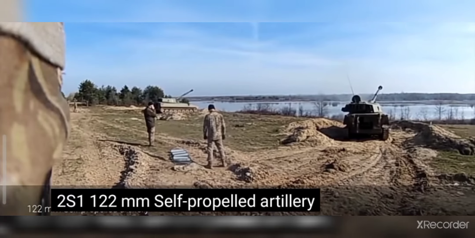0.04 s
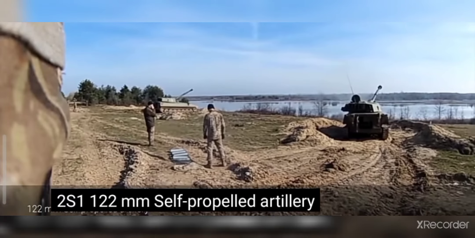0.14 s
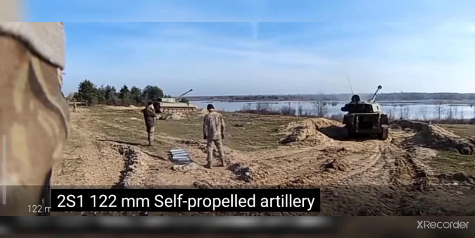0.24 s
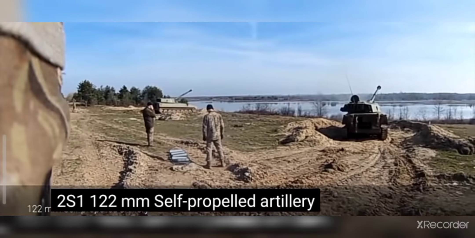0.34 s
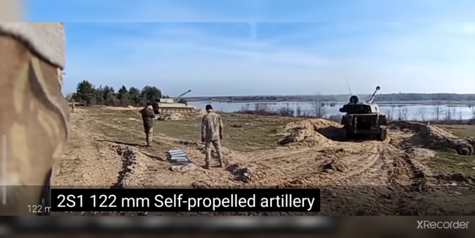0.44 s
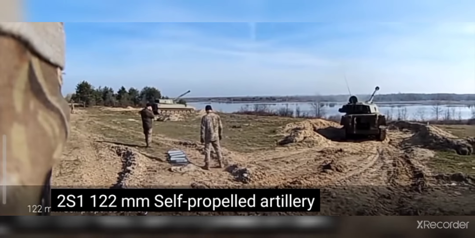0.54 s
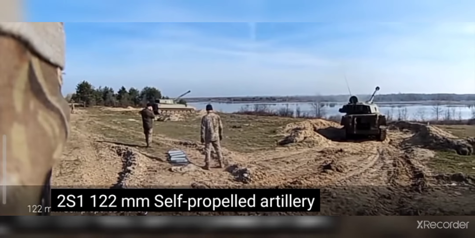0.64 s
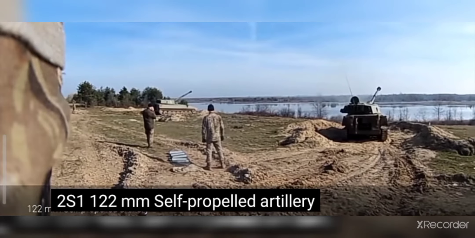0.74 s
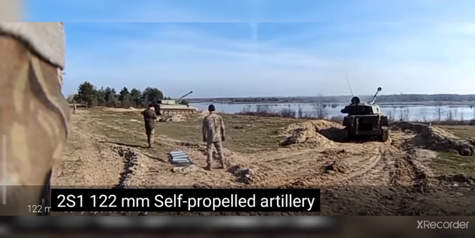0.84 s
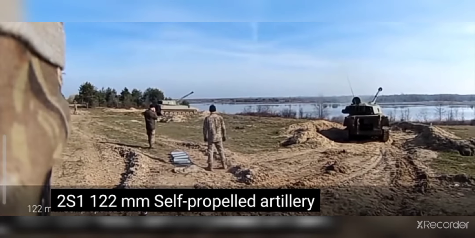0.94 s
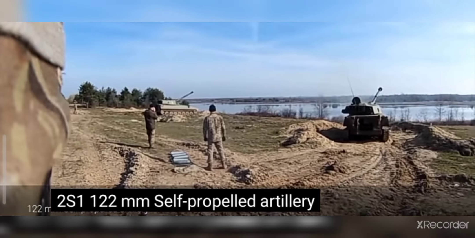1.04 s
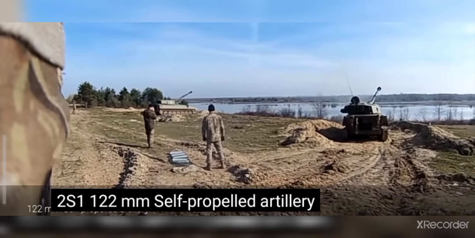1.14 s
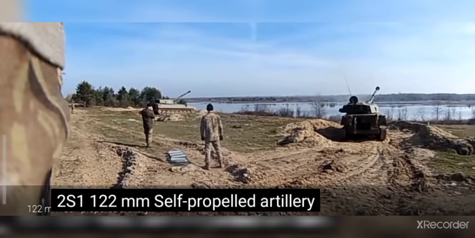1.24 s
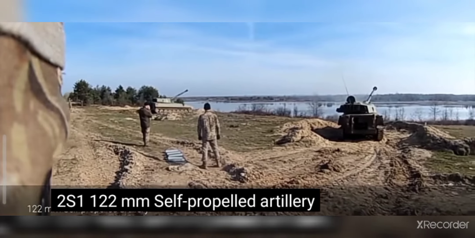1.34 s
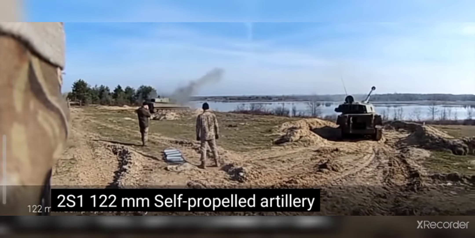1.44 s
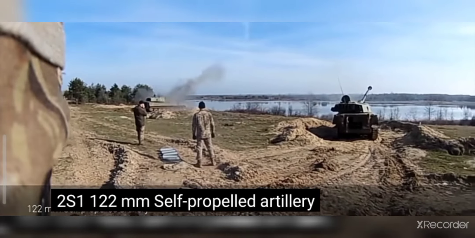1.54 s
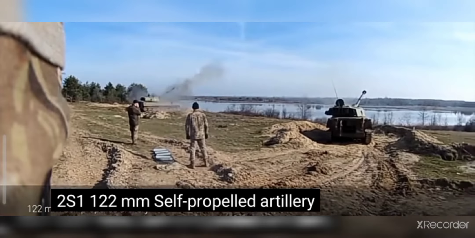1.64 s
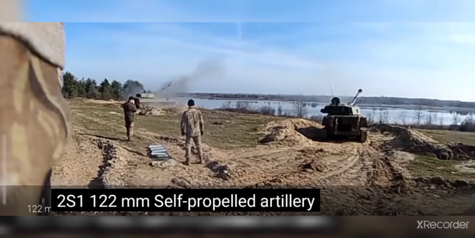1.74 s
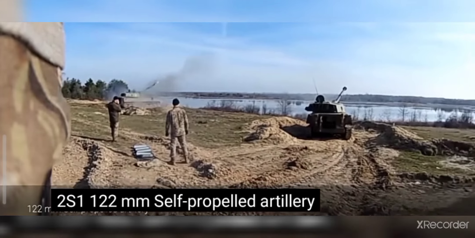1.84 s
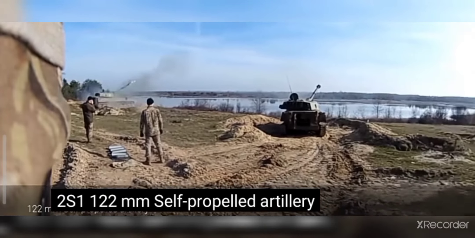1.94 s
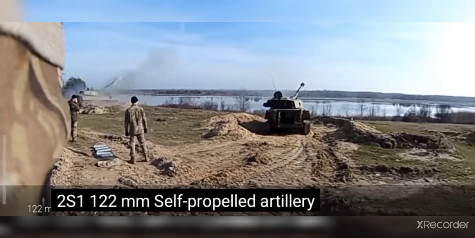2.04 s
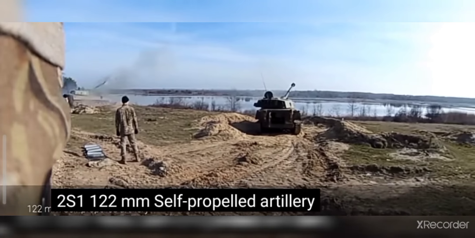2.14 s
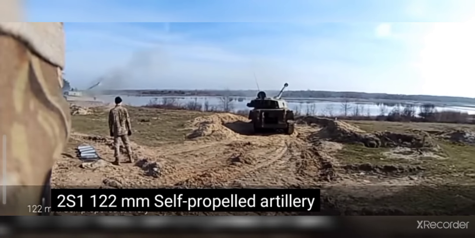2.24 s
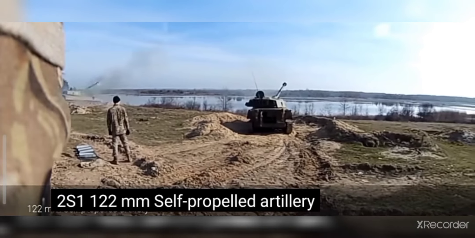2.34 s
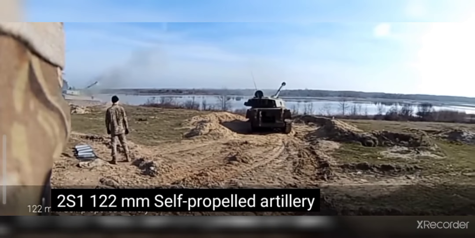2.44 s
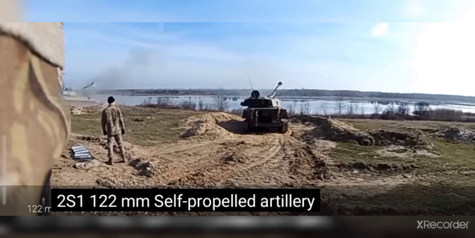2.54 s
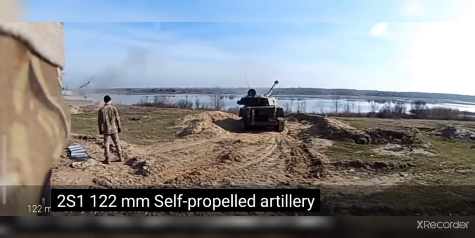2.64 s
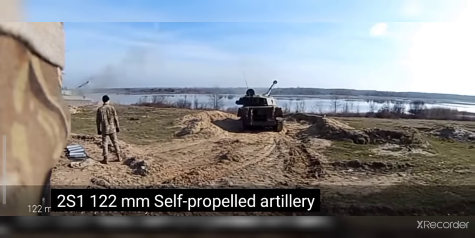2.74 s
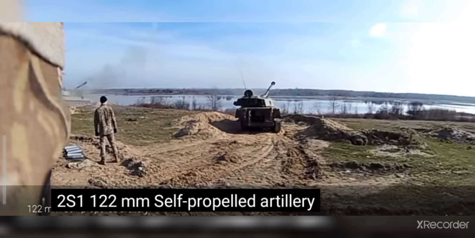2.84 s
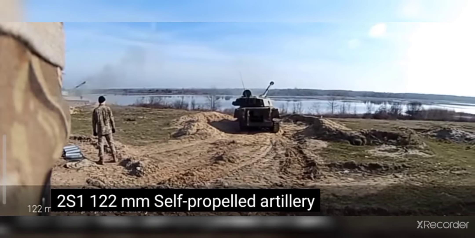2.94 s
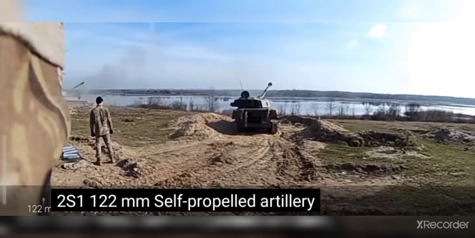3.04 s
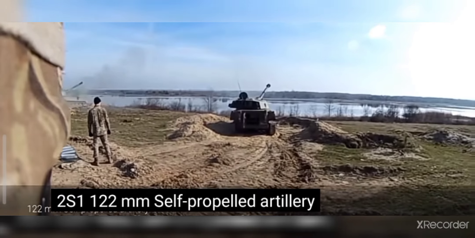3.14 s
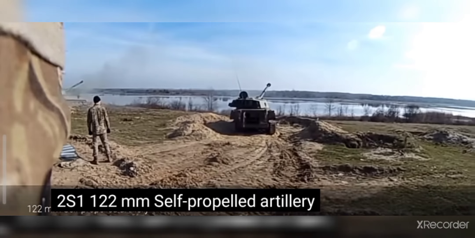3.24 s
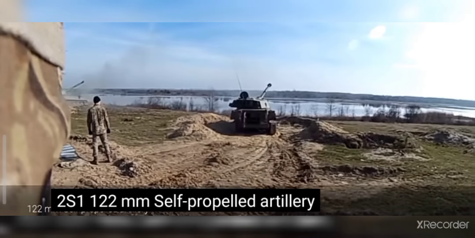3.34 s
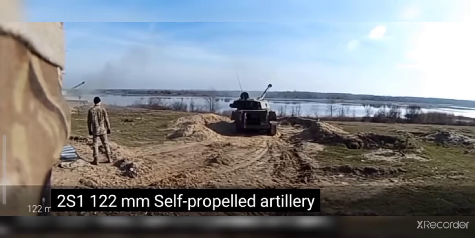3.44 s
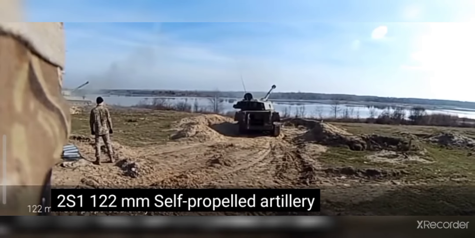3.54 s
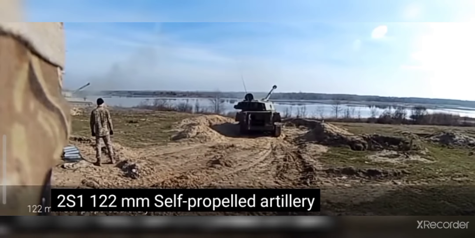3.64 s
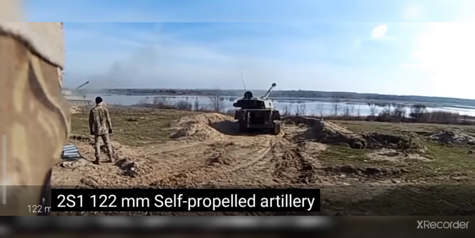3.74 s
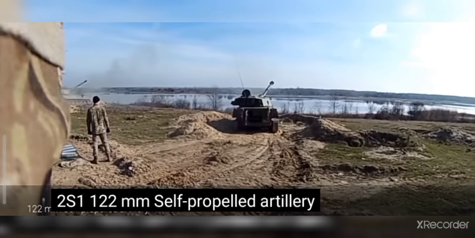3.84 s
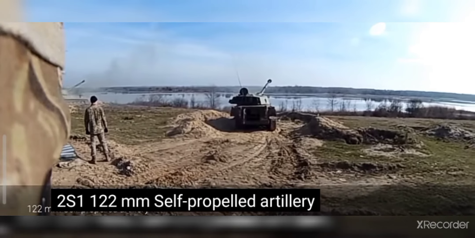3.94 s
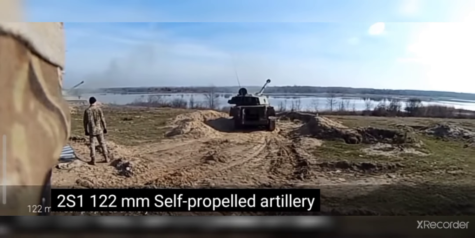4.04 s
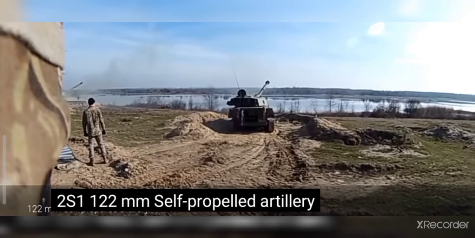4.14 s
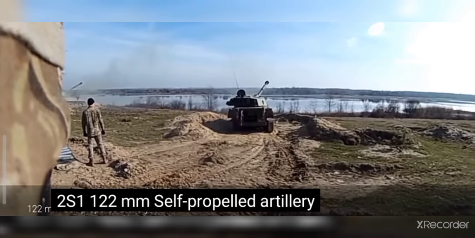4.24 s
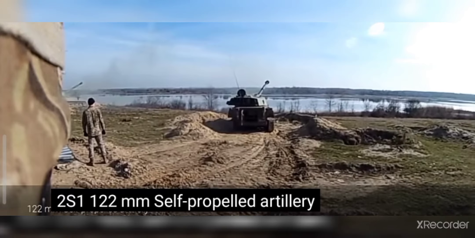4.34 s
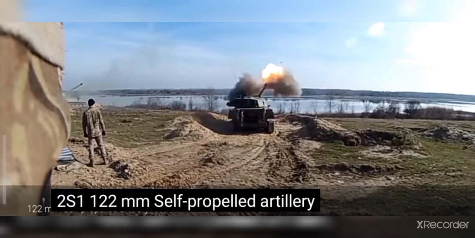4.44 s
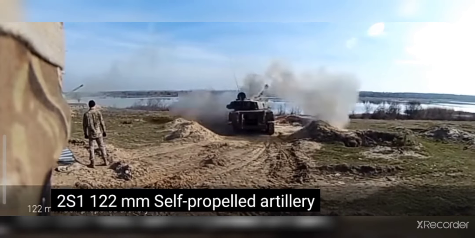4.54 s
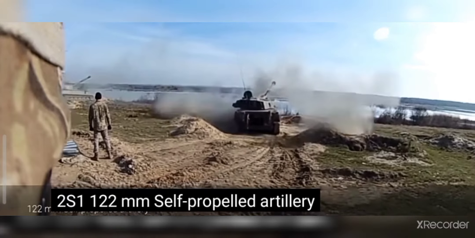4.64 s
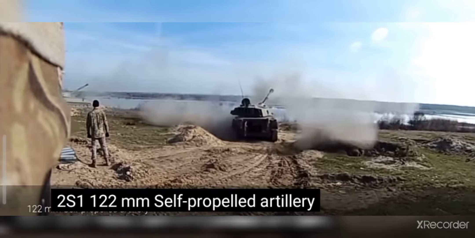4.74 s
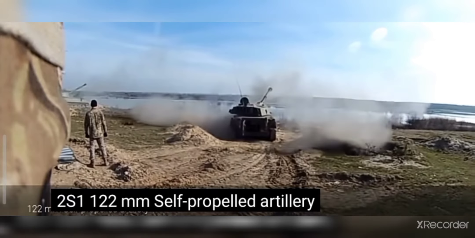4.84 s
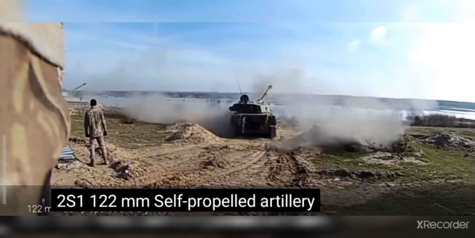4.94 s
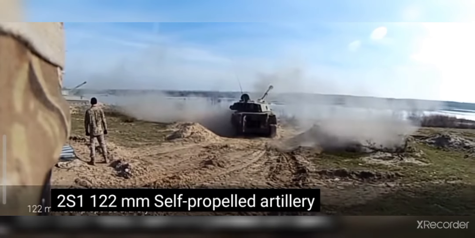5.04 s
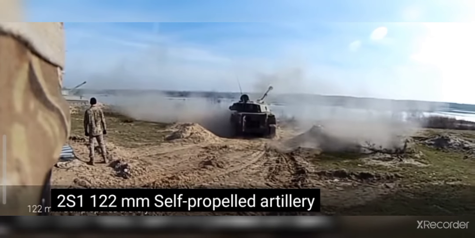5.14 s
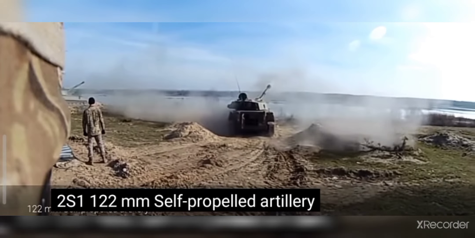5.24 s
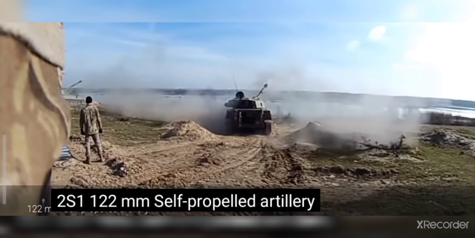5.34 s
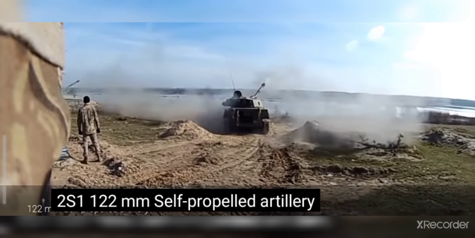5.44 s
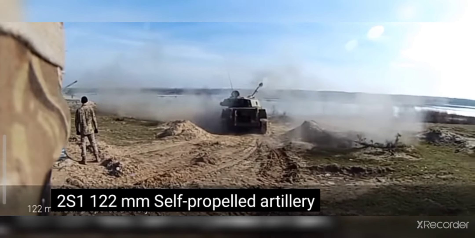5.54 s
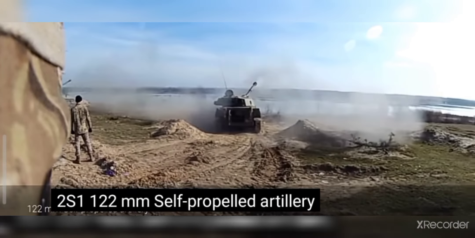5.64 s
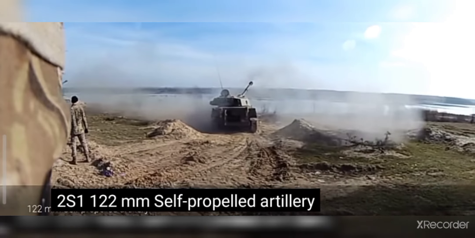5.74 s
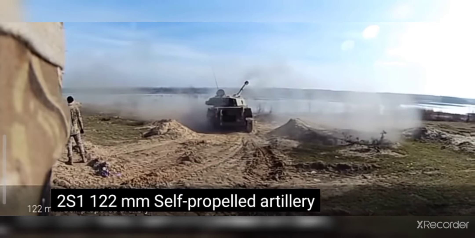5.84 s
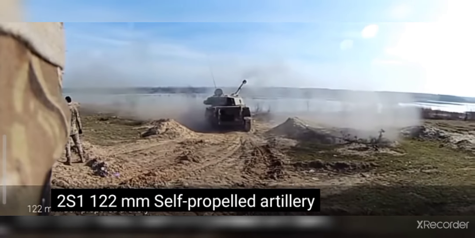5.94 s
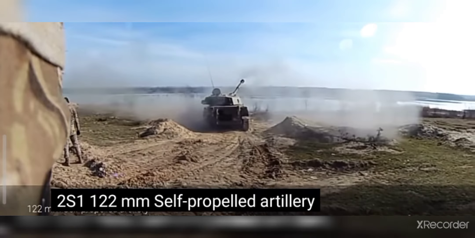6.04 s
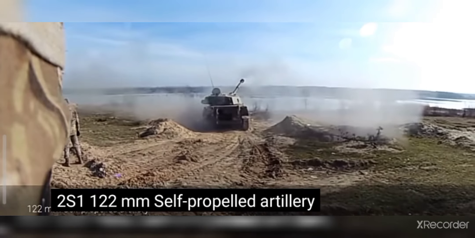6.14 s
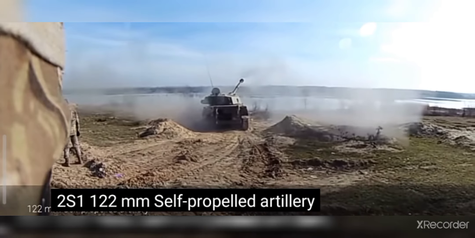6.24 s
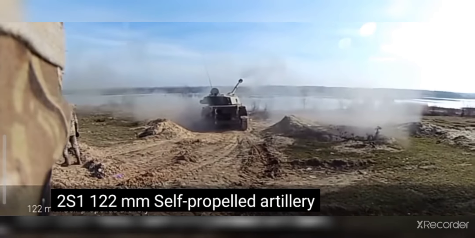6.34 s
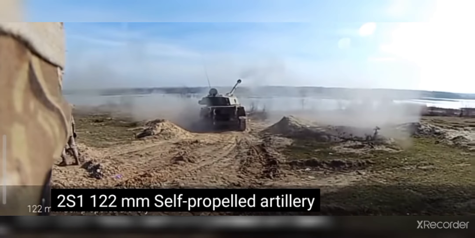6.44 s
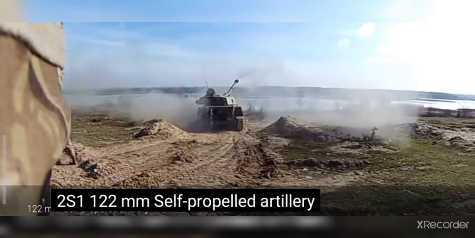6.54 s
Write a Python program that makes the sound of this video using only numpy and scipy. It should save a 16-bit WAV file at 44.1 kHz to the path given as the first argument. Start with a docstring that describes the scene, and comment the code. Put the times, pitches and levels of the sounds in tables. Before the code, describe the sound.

Over a faint diesel idle, two heavy guns fire about three seconds apart, torn overloaded blasts rolling into long low echoes, then a metallic clank and ringing case.

```python
"""Diesel engines idle on an open lake shore, then two self-propelled howitzers fire in turn, the far one first.
Each blast is a set of pressure fronts, crackles and roaring gas that overloads the input into a torn,
square-edged roar; filtered noise then rolls away as long low echoes. The shells leave as fluttering hiss.
After the near shot the breech clanks open and the spent case lands ringing, both as sums of decaying modes."""
import sys
import numpy as np
from scipy import signal
from scipy.fft import rfft, irfft, next_fast_len
from scipy.io import wavfile
from scipy.ndimage import uniform_filter1d

SR = 44100
rng = np.random.default_rng(int(sys.argv[2]) if len(sys.argv) > 2 else 0)


def materialize(psi):
    """Save the field psi as 16-bit PCM at rate SR to the path in sys.argv[1].

    A 1-D psi becomes a single channel; in a 2-D psi each row is a channel.
    """
    bounded = np.clip(np.atleast_2d(psi).T, -1, 1)
    quanta = np.round(bounded * 32767).astype(np.int16)
    wavfile.write(sys.argv[1], SR, quanta)


N = 290735
T = np.arange(N) / SR  # time, s
LENGTH = next_fast_len(N, True)
HZ = np.fft.rfftfreq(LENGTH, 1 / SR)

# spectrum of the roaring gas, also of the grit in the ground return: f/Hz, level/dB
GAS_SPECTRUM = [(40, -7.5), (250, 8.5), (800, -1.5), (2000, 2.5), (3000, -5), (7000, -16), (11000, -20.5),
                (16000, -26.5)]
# spectrum of the treble hiss in the echoes and flares: f/Hz, level/dB
HISS_SPECTRUM = [(1000, -13), (2500, 18.5), (4000, 12), (5300, 5), (7000, 3), (8700, 0.5), (10500, -1),
                 (14500, -8), (16000, -27.5)]


def amp(db):
    """Definition of the decibel: 20 dB is a tenfold gain."""
    return 10 ** (np.asarray(db) / 20)


def evened(x):
    """Normalization by root mean square: the result has rms 1."""
    return x / np.sqrt(np.mean(x ** 2) + 1e-20)


def shape(points):
    """Spectral envelope: a table of f/Hz, level/dB read as a gain on a logarithmic frequency axis."""
    hz, db = np.transpose(points)
    return amp(np.interp(np.log(HZ + 1), np.log(hz + 1), db))


def coloured(x, gain):
    """Linear filtering: the spectrum is multiplied by a gain at every frequency."""
    return irfft(rfft(x, LENGTH) * gain, LENGTH)[:N]


def noise(gain):
    """Coloured noise: filtered Gaussian white noise of rms 1."""
    return evened(coloured(rng.standard_normal(LENGTH), gain))


def drift(rate_hz):
    """Band-limited random fluctuation: noise of rms 1 under a Gaussian low-pass gain."""
    return noise(np.exp(-(HZ / rate_hz) ** 2))


def steadied(x, seconds):
    """Envelope levelling: division by short-time rms removes slow swells and keeps quick ones."""
    envelope = abs(signal.hilbert(x, next_fast_len(N))[:N])
    power = uniform_filter1d(envelope ** 2, max(int(seconds * SR), 1))
    return evened(x / np.sqrt(abs(power) + 1e-6))


def burst(s, decay, rise=0.0001, hold=0):
    """Exponential growth and relaxation: the envelope reaches 1 at s, holds and dies away."""
    before = (s - T) / rise
    after = (T - s - hold) / decay
    return np.exp(-np.clip(np.maximum(before, after), 0, 20))


def broad_rush():
    """Broadband noise with random amplitude modulation: a broad rush of noise swells twice."""
    # the two swells: t at full strength/s, level/dB, hold/s
    swell_times = [(3.322, -50.5, 0.9), (6.51, -48.5, .2)]
    # spectrum of the rush: f/Hz, level/dB
    swell_spectrum = [(120, 3), (260, 4.5), (500, 5), (900, 3), (1800, 0.5), (2600, -2), (3200, -9),
                      (4200, -29), (6000, -49)]
    rise_s, decay_s = 0.11, 0.5
    swells = sum(amp(db) * burst(s, decay_s, rise_s, hold) for s, db, hold in swell_times)
    uneven = amp(0.71 * drift(25))
    return evened(noise(shape(swell_spectrum)) * uneven) * swells


def engines(rattle_db=-62, waver_db=2.85, wander=0.0202):
    """Periodic exhaust: tones share one wandering engine speed, over a low rumble and valve-gear rattle."""
    # exhaust tones: f/Hz, level/dB
    hum_tones = [(37.7, -50.5), (71, -51), (94, -54.5), (123.5, -50.5), (204, -65)]
    # spectrum of the rumble: f/Hz, level/dB
    idle_spectrum = [(12, -29), (20, 5.5), (81, -20), (96, -7.5), (107, -8.5), (127, 0), (150, -8.5),
                     (210, -10.5), (319, -27.5), (1190, -40.5), (1960, -72.5), (2460, -46.5), (4060, -48.5),
                     (14300, -51.5), (16000, -64.5)]
    # spectrum of the valve gear: f/Hz, level/dB
    rattle_spectrum = [(800, -14.5), (1300, -2), (1700, -3), (2020, 4), (2450, -12), (2750, -5),
                       (3300, -19), (5000, -46.5)]
    idle_db = -50
    run = np.cumsum(1 + wander * drift(1)) / SR  # cycles turned by a 1 Hz tone
    hum = np.zeros(N)
    for hz, db in hum_tones:
        tone = np.sqrt(2) * np.sin(2 * np.pi * (hz * run + rng.random()))
        hum += amp(db + waver_db * drift(5)) * tone
    rumble = amp(idle_db) * steadied(noise(shape(idle_spectrum)), 0.4)
    rattle = amp(rattle_db + 1.0 * drift(40)) * noise(shape(rattle_spectrum))
    return hum + rumble + rattle


def metal(hits, modes, chatter=0.54, chatter_hz=45):
    """Modal vibration: a blow clatters and rings the modes of a piece that chatters against what it touches."""
    # spectrum of the clatter: f/Hz, level/dB
    clatter_spectrum = [(200, -26), (700, 4), (1300, 7), (2600, 11.5), (3600, -60), (7000, -2.5),
                        (15000, -33)]
    clatter, out = noise(shape(clatter_spectrum)), np.zeros(N)
    for hz, db, t60 in modes:
        sway = 1 + chatter * (drift(chatter_hz) + 1j * drift(chatter_hz))  # random amplitude and phase
        tone = (sway * np.exp(2j * np.pi * hz * T)).real
        decay = t60 / np.log(1000)
        ringing = sum(amp(ring_db) * burst(s, decay) for s, ring_db, _, _ in hits)
        out += amp(db) * tone * ringing
    for s, _, clatter_db, decay in hits:
        out += amp(clatter_db) * clatter * burst(s, decay)
    return out


def breech():
    """Impact excitation of a heavily damped body: the breech clanks open."""
    # blows: t/s, ring level/dB, clatter level/dB, clatter decay/s
    breech_blows = [(4.9105, -30, -15.5, 0.006), (4.926, -27, -22.5, 0.03)]
    # modes: f/Hz, level relative to the ring/dB, t60/s
    breech_modes = [(1460, -2, 0.13), (1410, -1, 0.16), (1980, -5, 0.22), (2640, -15, .08),
                    (3130, -22, .11), (7800, -18, 0.12)]
    return metal(breech_blows, breech_modes)


def spent_case():
    """Impact excitation of a lightly damped body: the spent case lands ringing."""
    # blows: t/s, ring level/dB, clatter level/dB, clatter decay/s
    case_blows = [(5.279, -30, -28, 0.015), (5.2855, -64, -33.5, 0.023)]
    # modes: f/Hz, level relative to the ring/dB, t60/s
    case_modes = [(1022, -5, 0.57), (1630, -5, 0.78), (2280, -12, 0.68), (2486, -1, 0.43), (2546, 6, 0.38),
                  (2723, 3, 0.24), (3340, -23, .19), (4630, -19, 0.24), (7400, -19, 0.2)]
    return metal(case_blows, case_modes)


def shell(width_hz=520, flutter_db=1.4):
    """Aerodynamic noise: air torn round each shell is a fluttering, fading noise band of wandering centre."""
    # departing shells: t at full strength/s, level/dB, hold/s, decay/s
    shell_flights = [(1.554, -44.5, .03, 0.56), (4.827, -37, 0.27, 0.49)]
    # centre of the band: t/s, f/Hz
    centre_path = [(1.56, 2802), (4.76, 3150), (4.93, 2857), (5.0, 3130), (5.25, 3376), (5.5, 2986),
                   (6.4, 2910)]
    rise_s = 0.034
    centre_hz = np.interp(T, *np.transpose(centre_path))
    turn = np.exp(2j * np.pi * np.cumsum(centre_hz) / SR)
    band = (turn * (drift(width_hz) + 1j * drift(width_hz))).real  # noise shifted up to the centre
    flights = sum(amp(db) * burst(s, decay, rise_s, hold) for s, db, hold, decay in shell_flights)
    return band * amp(flutter_db * drift(25)) * flights


def flicks():
    """Amplitude modulation of coloured noise: the treble hiss flares briefly a few times."""
    # flares: t/s, level/dB, decay/s
    flares = [(2.75, -61.5, 0.4), (3.785, -57.5, 0.034), (4.93, -33, 0.12), (5.42, -40.5, 0.066),
              (5.564, -41.5, 0.046), (5.66, -51.5, 0.14)]
    rise_s = 0.01
    return noise(shape(HISS_SPECTRUM)) * sum(amp(db) * burst(s, decay, rise_s) for s, db, decay in flares)


def cracks(edge=2.3):
    """Impulsive reflection: sharp echoes and knocks, an edge and a little scatter, each dulled by its path."""
    # snaps: t/s, level (9.5 dB under the peak)/dB, decay/s, dull above f/Hz
    snaps = [(1.686, -22.5, 0.0075, 1580), (2.298, -29.5, 0.00032, 2600), (2.3324, -30, 0.0024, 1610),
             (2.4657, -38.5, 0.0033, 1480), (2.715, -45.5, 0.037, 2180), (3.384, -47, 0.021, 1250),
             (4.746, -28, .003, 4000), (4.8083, -19.5, 0.0014, 3000), (5.4721, -32.5, 0.0031, 1800)]
    out = np.zeros(N)
    for s, db, decay, dull_hz in snaps:
        scatter = rng.standard_normal(N) * burst(s, decay)
        snap = scatter + edge * burst(s, 0.000075, rise=0.00005)
        band_hz = [350, np.clip(dull_hz, 700, 9000)]
        snap = signal.sosfilt(signal.butter(2, band_hz, "band", fs=SR, output="sos"), snap)
        out += amp(db + 9.5) * snap / abs(snap).max()
    return out


def roll(s, delay, spread_db, loss_db_per_s):
    """Spreading and absorption: a roll builds up, then later returns, having come further, are weaker."""
    age = np.maximum(T - s, delay)
    build = np.clip((T - s) / delay, 0, 1) ** 1.2
    # spread_db is the fall for each tenfold length of path
    return build * amp(-spread_db * np.log10(age / delay) - loss_db_per_s * (age - delay))


def rolling_echoes(grain_db=1.23, lump_db=2.0):
    """Diffuse reflection: a lumpy boom, grainy rush and thin hiss roll away, with separate echoes standing out."""
    # long roll of each shot: shot t/s, time to peak/s, boom level/dB, rush level/dB, hiss level/dB,
    # rush loss/(dB/s), hiss loss/(dB/s)
    shot_rolls = [(1.302, .25, -11, -32, -31, 8, 0), (4.421, 0.38, -14, -26, -28.5, 12, 14.5)]
    # echoes from woods and shore: t/s, boom level/dB, thud level/dB, rush level/dB, decay/s
    separate_echoes = [(1.68, -26, -28.5, -32.5, 0.16), (1.85, -10, -30, -26.5, 0.15),
                       (2.1, -20, -33.5, -44, .07), (2.351, -18.5, -30, -43, 0.13),
                       (2.71, -29, -56, -61, 0.089), (3.39, -39, -34.5, -45.5, 0.11),
                       (3.71, -36, -40, -52, 0.18), (3.9, -30.5, -39, -52.5, 0.19),
                       (4.119, -29.5, -44.5, -58.5, 0.31), (4.70, -9, -14.5, -42, 0.058),
                       (4.92, -39, -21, -43, 0.1), (5.33, -20.5, -28, -46, 0.16),
                       (5.58, -27.5, -44, -38.5, 0.27), (6.02, -24.5, -54, -64, 0.22)]
    # boom spectra of the far and the near shot, then thud and rush spectra: f/Hz, level/dB
    far_boom = [(11, -38), (18, -2.5), (32, 7.5), (46, 3), (97, -4), (135, -15.5), (226, -31.5),
                (260, -34.5), (447, -40.5), (500, -34), (650, -69.5), (1100, -120)]
    near_boom = [(11, -46), (18, -8), (43, 5), (69, 0.5), (82, -2.5), (102, -8), (135, -9), (260, -33.5),
                 (389, -36.5), (500, -33.5), (650, -77), (1100, -120)]
    thud_spectrum = [(60, -20), (130, 6.5), (190, 1.5), (300, -21.5), (600, -17.5), (1200, -38.5),
                     (3000, -72.5)]
    rush_spectrum = [(100, 8), (250, 13.5), (450, 0.5), (800, 0), (1500, 0), (2300, 0), (3000, -10),
                     (4000, -14.5), (6000, -42), (12000, -58)]
    boom_spread_db, rush_spread_db, hiss_spread_db = 22, 13.5, 43.5
    boom_loss_db_per_s = 0.87  # absorbed by air and ground
    echo_rise_s = 0.02
    grain, lumps = amp(grain_db * drift(60)), amp(lump_db * drift(18))
    rush = evened(noise(shape(rush_spectrum)) * grain)
    hiss = evened(noise(shape(HISS_SPECTRUM)) * grain)
    thud, out = steadied(noise(shape(thud_spectrum)), 0.066), np.zeros(N)
    ends = [row[0] for row in shot_rolls[1:]] + [np.inf]
    for row, end, colour in zip(shot_rolls, ends, (far_boom, near_boom)):
        s, delay, boom_db, rush_db, hiss_db, rush_loss, hiss_loss = row
        boom_level = amp(boom_db) * roll(s, delay, boom_spread_db, boom_loss_db_per_s)
        rush_level = amp(rush_db) * roll(s, delay, rush_spread_db, rush_loss)
        for at, echo_boom_db, thud_db, echo_rush_db, decay in separate_echoes:
            if s < at < end:  # an echo adds its power to the roll of its own shot
                echo = burst(at, decay, echo_rise_s)
                boom_level = np.hypot(boom_level, amp(echo_boom_db) * echo)
                rush_level = np.hypot(rush_level, amp(echo_rush_db) * echo)
                out += amp(thud_db) * thud * echo
        boom = steadied(noise(shape(colour)), 0.056) * lumps
        out += boom * boom_level + rush * rush_level
        out += hiss * amp(hiss_db) * roll(s, delay, hiss_spread_db, hiss_loss)
    return out


def ground_thunder():
    """Scattering: the ground nearby returns a dense, deep roar with lumps of grit; distance dulls the roar."""
    # scattered blasts: t/s, thunder level/dB, hold/s, t60 after the hold/s, dull above f/Hz,
    # grit level/dB, grit t60/s
    scattered_shots = [(1.305, 0.5, 0.2, 0.44, 170, -25.5, 0.71), (4.413, 0, 0.28, 0.44, 504, -19.5, 0.18)]
    # spectrum of the thunder: f/Hz, level/dB
    thunder_spectrum = [(15, -21.5), (35, -3.5), (55, 0), (85, -13), (180, -16), (300, -21.5), (600, -35.5),
                        (1500, -42.5), (4000, -84)]
    grit = evened(noise(shape(GAS_SPECTRUM)) * amp(0.83 * drift(60)))
    out = np.zeros(N)
    for s, db, hold, t60, dull_hz, grit_db, grit_t60 in scattered_shots:
        dulling = np.hypot(1, HZ / dull_hz)
        thunder = steadied(noise(shape(thunder_spectrum) / dulling), 0.068)
        swell = 1 - np.exp(-np.maximum(T - s, 0) / 0.03)
        dying = np.maximum(T - s - hold, 0)
        thunder_level = amp(db - 60 * dying / t60)
        grit_level = amp(grit_db - 60 * dying / grit_t60)
        out += swell * (thunder * thunder_level + grit * grit_level)
    return out


def muzzle_blasts(rise=0.0018):
    """Blast wave: each front or crackle is a pressure jump, a suction phase and a short roar of gas."""
    # fronts of both shots and short crackles inside the overloaded roar:
    # t/s, push level/dB, gas roar level/dB, roar decay/s
    fronts_and_crackles = [(1.307, 6.5, 9, 0.0021), (1.319, 0, 1, 0.004), (1.329, -14, -13.5, 0.039),
                           (1.379, 1, -14.5, 0.00067), (1.458, 11, -10, 0.0053), (1.537, -13, -15, .002),
                           (4.399, -1.5, -16.5, 0.01), (4.412, 17, 3, 0.01), (4.423, -25, 11, 0.014),
                           (4.436, -8.5, 5.5, 0.0023), (4.475, -7, -13.5, 0.0025), (4.61, -15, -17, 0.009),
                           (4.624, -9, -8, 0.012), (4.665, -4, -12, 0.0013)]
    push_s = 0.0035  # the pressure swings from push to suction after this time
    gas, out = noise(shape(GAS_SPECTRUM)), np.zeros(N)
    for s, push_db, roar_db, decay in fronts_and_crackles:
        age = np.clip(T - s, 0, 20 * push_s)
        pressure = np.tanh(age / rise) * (1 - age / push_s) * np.exp(-age / push_s)
        out += amp(push_db) * pressure
        out += amp(roar_db) * gas * burst(s, decay)
    return out


def scene():
    """Superposition: the coloured gun sounds and all other sources add in one channel, sent to both sides."""
    # microphone colour, put on the gun sounds, with a hollow at 5 kHz and a peak at 7 kHz: f/Hz, level/dB
    microphone = [(2000, -2), (3100, -0.5), (3800, -5), (5300, -9), (6100, 0), (6900, 8.5), (8300, 6),
                  (10000, -5.5), (16000, -4.5)]
    guns = muzzle_blasts() + ground_thunder() + rolling_echoes() + flicks() + cracks()
    loading = breech() + spent_case()
    mono = coloured(guns, shape(microphone)) + shell() + loading + engines() + broad_rush()
    return np.array([mono, mono])


def record(dry, knee=2.36, spread=2.):
    """Saturation flattens the blasts; loud treble is given a little random stereo width; a low-pass ends the band."""
    overload, edge_hz = 0.35, 16000
    drive = dry / overload
    clipped = drive / (1 + abs(drive) ** knee) ** (1 / knee)
    flat = overload * (clipped + 0.06 * np.arcsinh(drive))  # the second term still grows past the limit
    treble = signal.sosfilt(signal.butter(8, 5200, "high", fs=SR, output="sos"), flat[0])
    loudness = uniform_filter1d(abs(treble), size=400)
    side = spread * loudness * treble * drift(400)
    wide = flat + np.array([side, -side])
    low_pass = signal.firwin(255, edge_hz, window=("kaiser", 9), fs=SR)
    return signal.oaconvolve(wide, low_pass[None], "same")


dry = scene()
out = record(dry)
materialize(out)
```